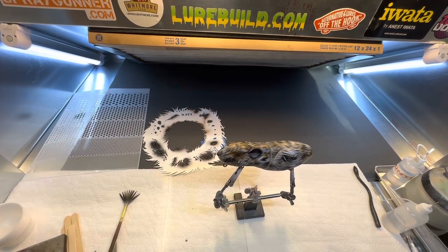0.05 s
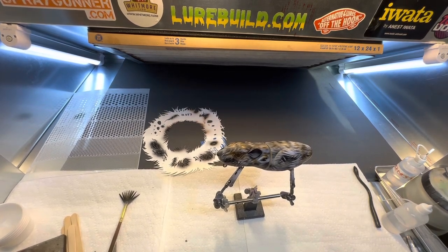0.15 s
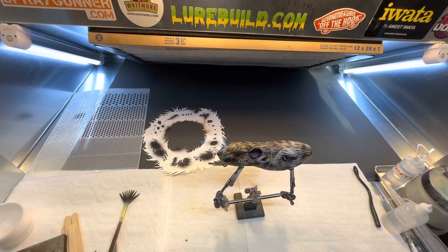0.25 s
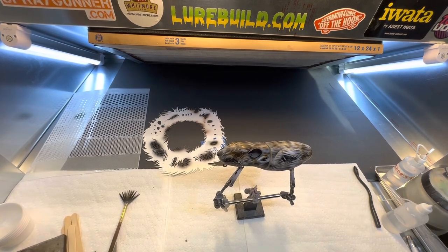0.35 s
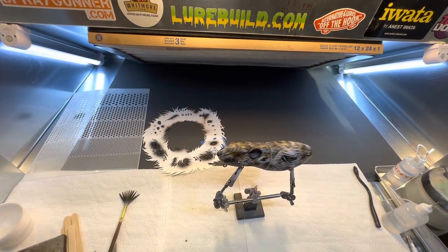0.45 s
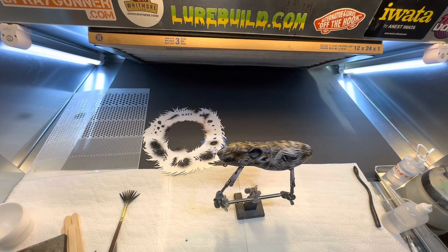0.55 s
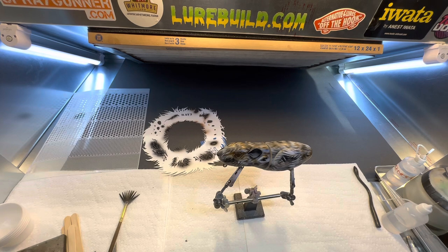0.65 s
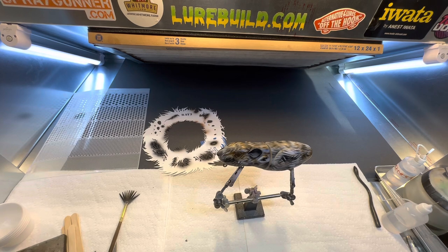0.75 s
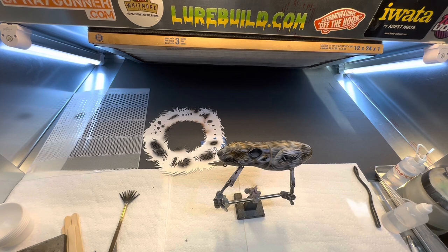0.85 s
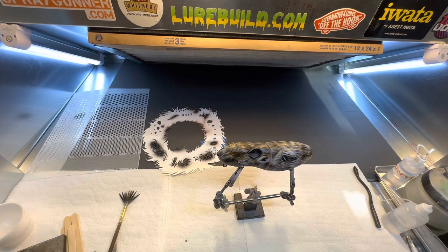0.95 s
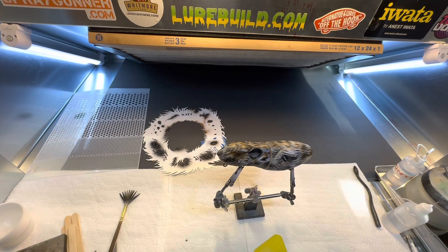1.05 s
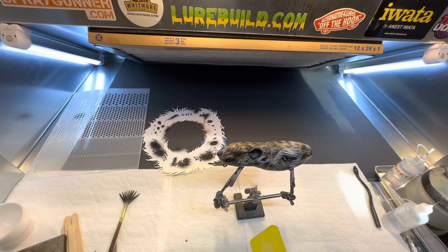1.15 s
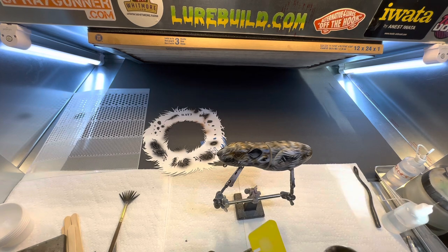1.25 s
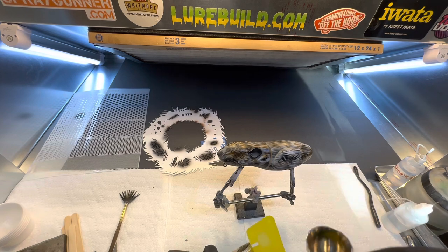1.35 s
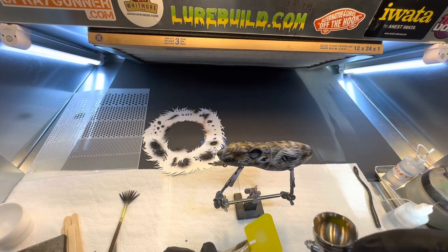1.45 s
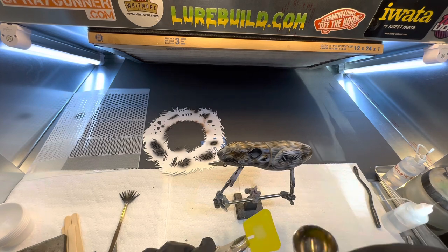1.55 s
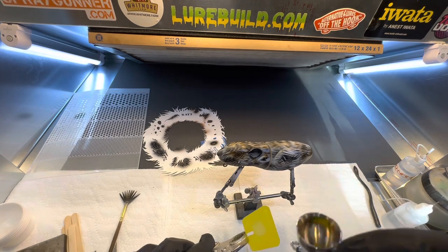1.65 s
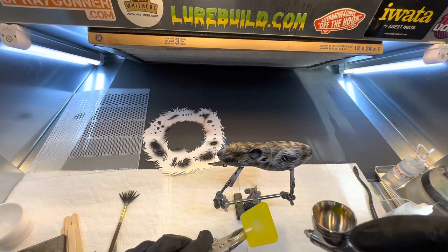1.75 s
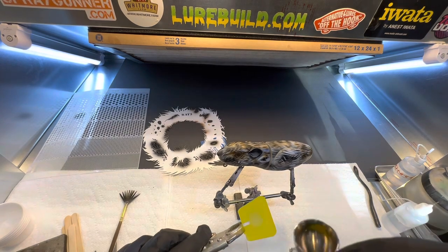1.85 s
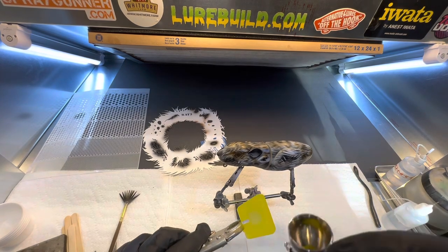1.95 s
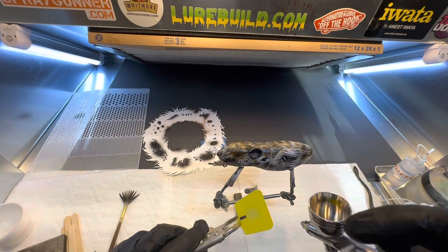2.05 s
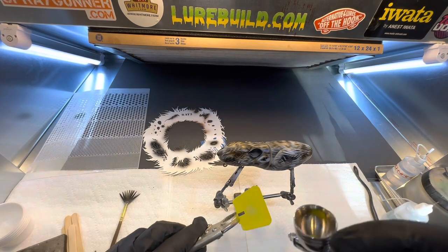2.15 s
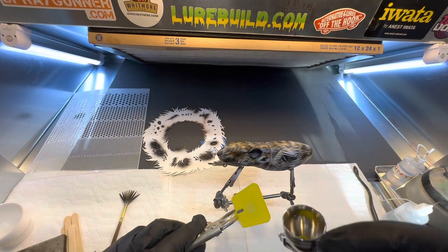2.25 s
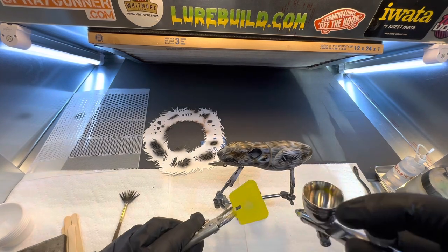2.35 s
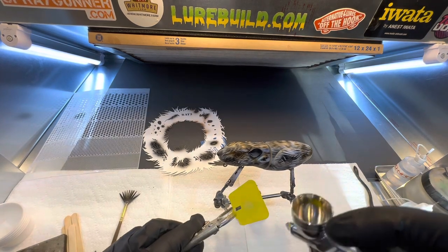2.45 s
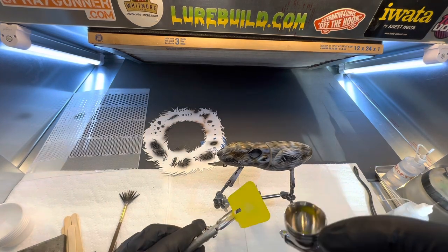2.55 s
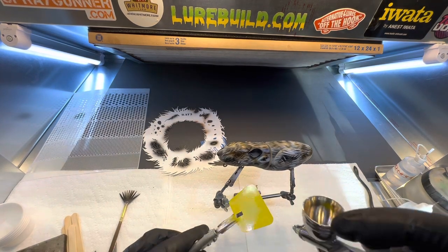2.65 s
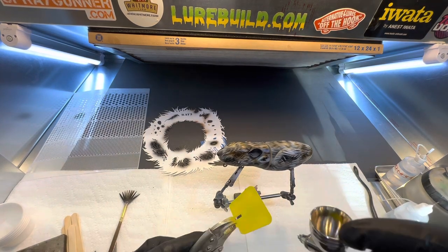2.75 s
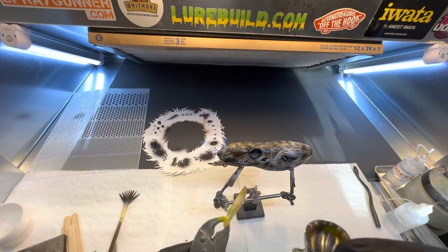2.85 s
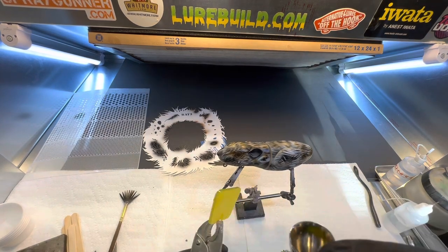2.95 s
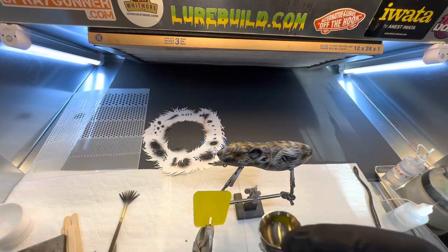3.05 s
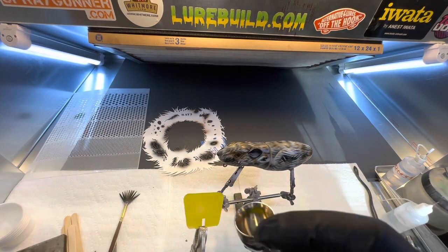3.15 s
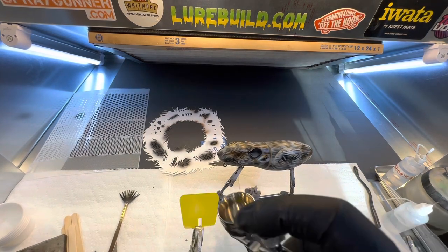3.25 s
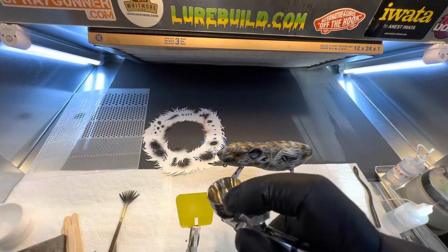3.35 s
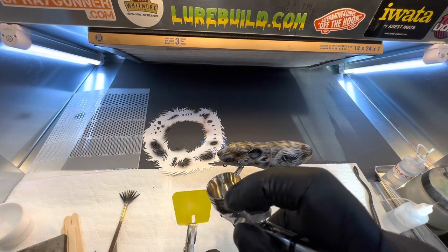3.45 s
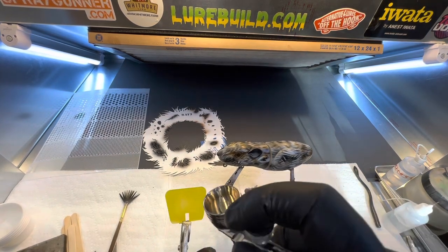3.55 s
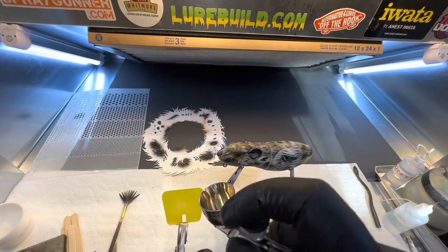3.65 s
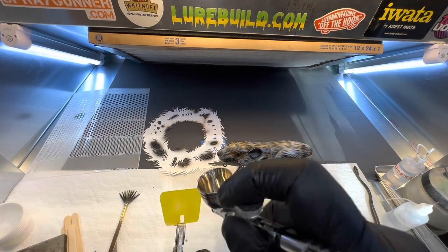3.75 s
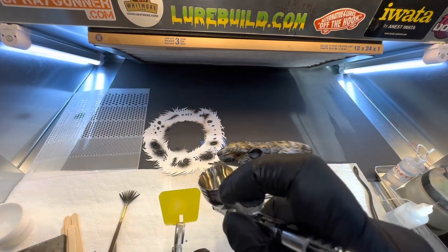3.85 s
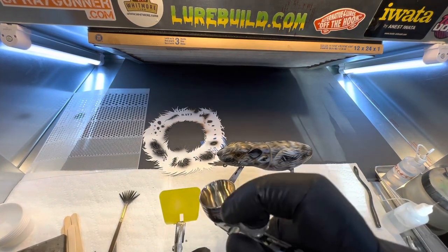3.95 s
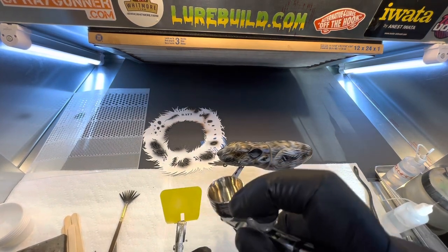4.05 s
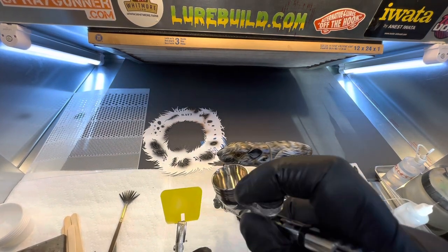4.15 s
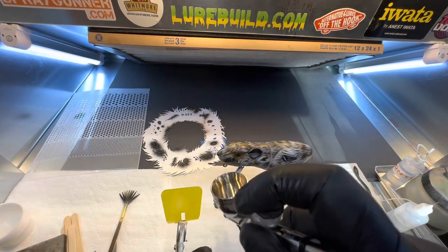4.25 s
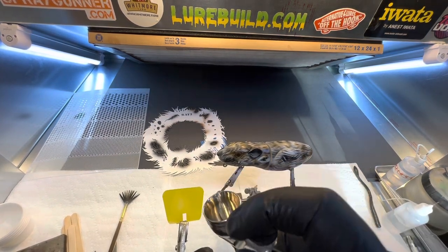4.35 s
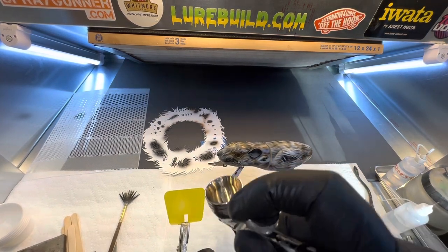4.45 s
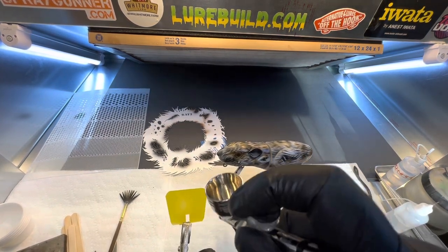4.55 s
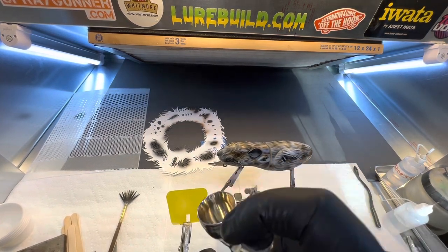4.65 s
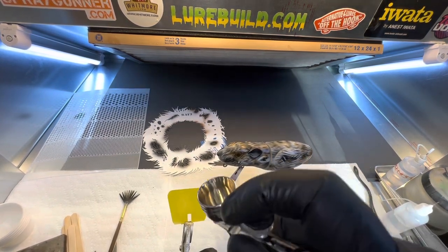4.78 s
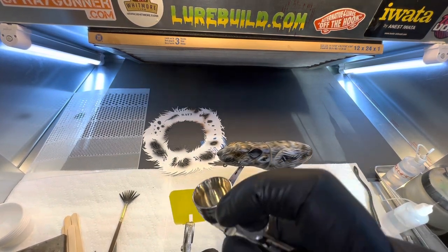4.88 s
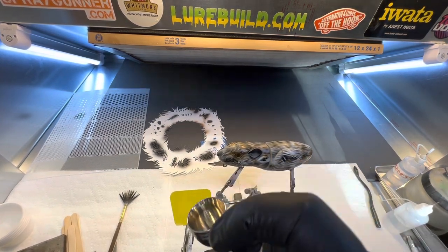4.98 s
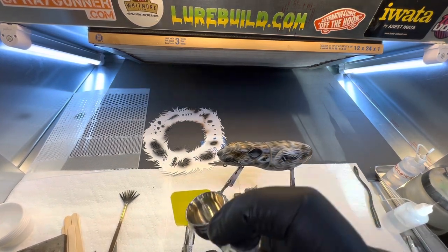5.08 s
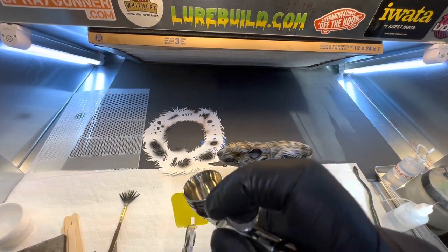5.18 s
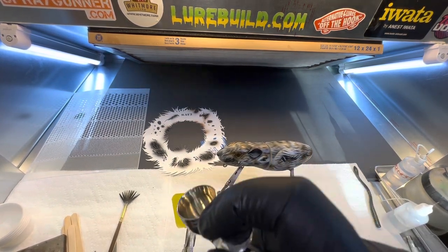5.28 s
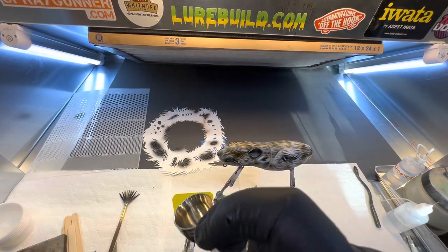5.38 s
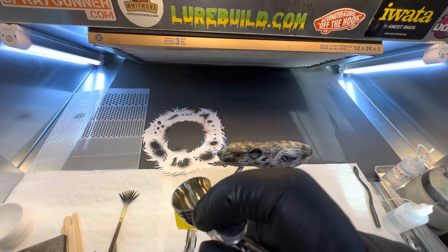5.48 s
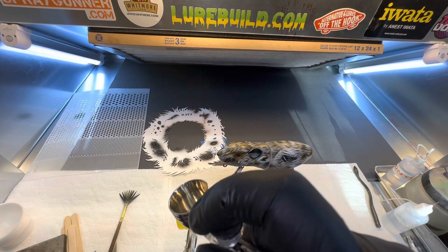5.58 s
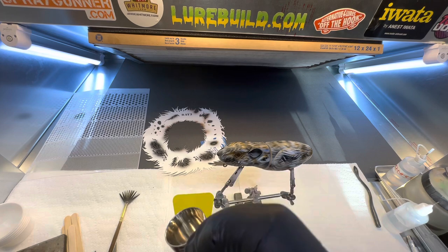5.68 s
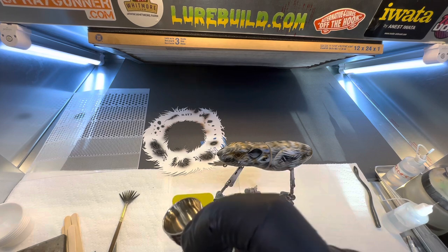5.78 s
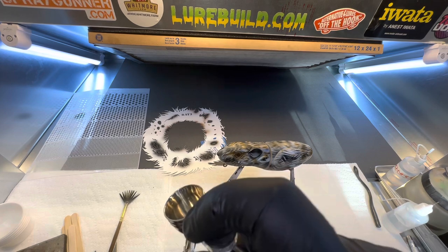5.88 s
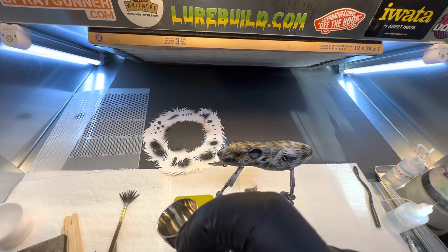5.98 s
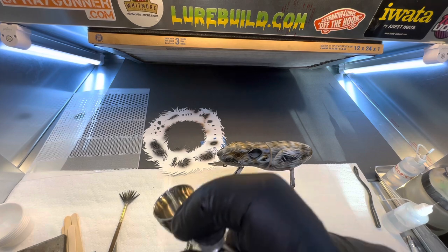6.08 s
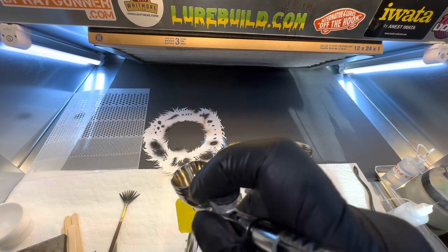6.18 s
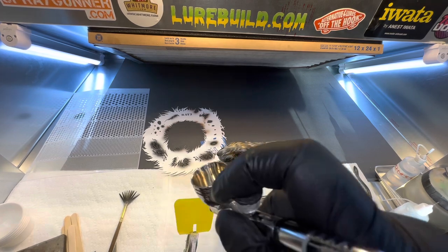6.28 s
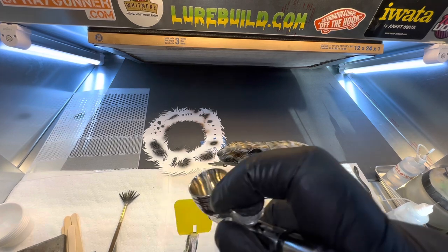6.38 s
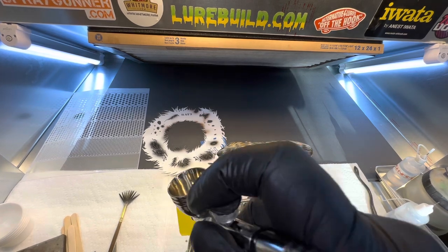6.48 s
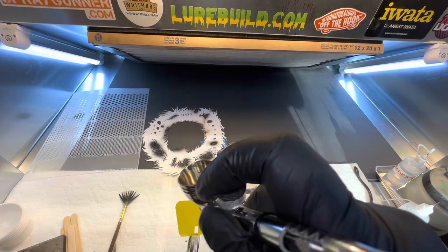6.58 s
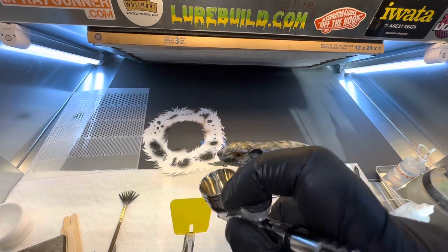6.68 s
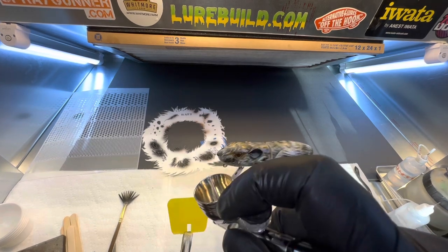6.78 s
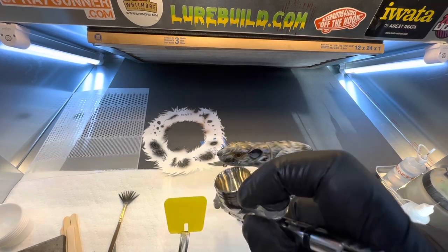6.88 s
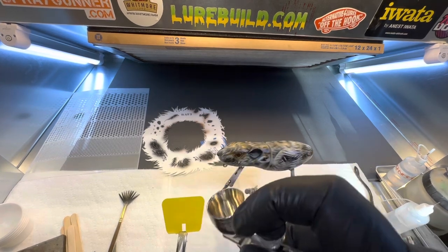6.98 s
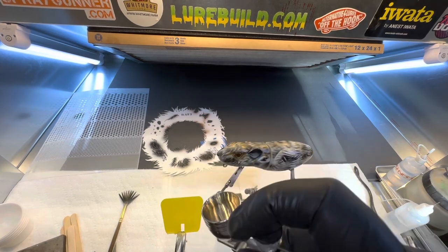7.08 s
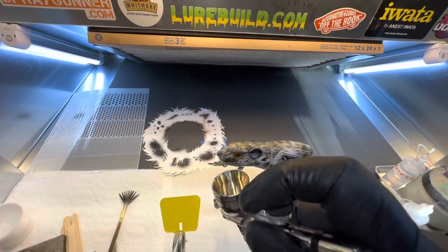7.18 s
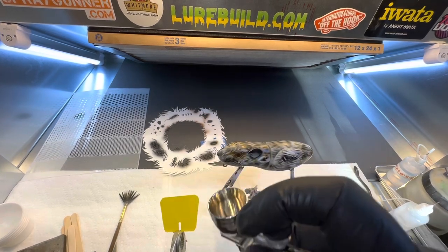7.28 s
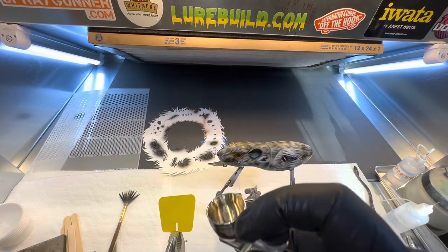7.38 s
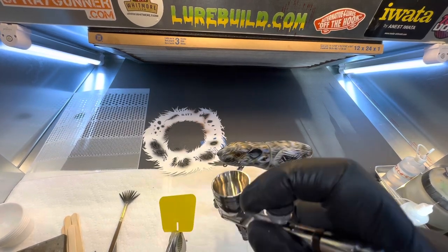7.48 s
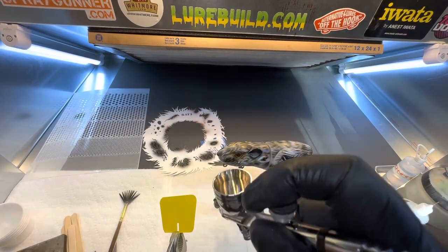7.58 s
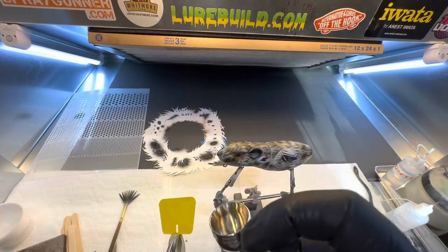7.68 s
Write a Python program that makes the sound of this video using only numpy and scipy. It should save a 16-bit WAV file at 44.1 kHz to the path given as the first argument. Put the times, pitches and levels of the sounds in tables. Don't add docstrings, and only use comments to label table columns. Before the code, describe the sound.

A close stereo microphone in a small spray booth. An exhaust fan rumbles low throughout, with a soft rush of air in the duct. From the start an airbrush hisses thin and very high, with a brief broader draught across the microphone until about 1.3 s. At 1.0 s a tool taps the hollow bench, a short dry knock with a scuff. The hiss weakens, swelling briefly around 1.8 to 2.4 s. At 2.4 s a valve spits air sharply, with a brief falling sigh and fading tail. The compressor buzzes, jerks at 2.55 s, catches at 2.6 s and rocks the bench with a heavy low throb until about 3.2 s. It then hums steadily, knocking and clattering rapidly. From 3.4 s the spray is fuller and splashier, with strokes swelling around 4.4, 4.7, 5.0, 5.4, 5.7 and 6.8 s, continuing to the end at about 7.7 s.

```python
import sys
import numpy as np
from scipy import signal
from scipy.fft import rfft, irfft, next_fast_len
from scipy.io import wavfile
from scipy.ndimage import uniform_filter1d, map_coordinates

SR = 44100
rng = np.random.default_rng(int(sys.argv[2]) if len(sys.argv) > 2 else 0)


def nominal_scale(level):
    x = np.asarray(level, float) / 20
    return 10 ** x


def bounce(signal):
    frames = np.transpose(np.atleast_2d(signal))
    limited = np.clip(frames, -1, 1)
    pcm = np.round(limited * 32767).astype(np.int16)
    wavfile.write(sys.argv[1], SR, pcm)


N = 340452


def unit(x):
    return x / np.sqrt(np.mean(x ** 2) + 1e-20)


def along(points, hz):
    f, *columns = np.transpose(points)
    return [np.interp(np.log(hz + 1), np.log(f + 1), column) for column in columns]


def wobble(rate, size=N):
    knots = rng.standard_normal(int(N * rate / SR) + 4)
    return map_coordinates(knots, [np.arange(size) * (rate * N / SR / size)])


def ramp(start_s, length_s):
    return np.clip((np.arange(N) / SR - start_s) / length_s, 0, 1)


def placed(start_s, x):
    return np.pad(x, ((0, 0), (round(start_s * SR), N)))[:, :N]


def burst(db, rise_s, t60_s):
    t = np.arange(SR) / SR
    return nominal_scale(db - 60 * t / t60_s) * (1 - np.exp(-t / rise_s))


# (frequency [Hz], left minus right [dB], likeness [0-1],
# left leads [rad])
PORTS = [(60, -0.5, .97, 0), (200, 3, 1, 0), (400, 2.5, 0.65, 0), (655, 0.5, 0.06, 2.5),
         (3500, 2, 0.11, 2.5), (5100, 8.5, 0.2, 0), (6400, 10, 0, -0.5), (8100, 7, 0, 1.5),
         (9200, -2, 0.2, 1.5), (9760, 0, 0.5, 1.3),
         (10400, 0, .97, -3.1), (12000, 0, .98, -3.05), (12350, 0, .9, -2.5), (12750, 0, .78, -1.8),
              (13400, 0, .9, -.7), (13850, 0, 1, 0), (15100, 0, 1, 0), (15300, 0, .92, .5),
              (15800, 0, .9, .55)]


def rush(spectrum, patchy_db, size=N, ports=PORTS):
    noise = rng.standard_normal((2, size), dtype=np.float32)
    z = signal.stft(noise, nperseg=512)[2]
    field = uniform_filter1d(rng.standard_normal(z.shape[1:]), size=6, axis=0)
    patches = unit(uniform_filter1d(field, size=12, axis=1))
    pair = signal.istft(z * nominal_scale(patchy_db * patches), nperseg=512)[1][:, :size]

    m = next_fast_len(size + 8192, True)
    hz = np.fft.rfftfreq(m, 1 / SR)
    inside = (hz > spectrum[0][0]) & (hz < spectrum[-1][0])
    a, b = rfft(pair, m) * nominal_scale(along(spectrum, hz)[0]) * inside

    tilt_db, alike, lead = along(ports, hz)
    turn = np.arccos(np.clip(alike, 0, 1)) / 2
    half = nominal_scale(tilt_db / 2) * np.exp(.5j * lead)
    common, apart = np.cos(turn) * a, np.sin(turn) * b
    out = irfft([(common + apart) * half, (common - apart) / half], m)[:, :size]
    return out / np.std(out.mean(axis=0))


# (frequency [Hz], density [dB per Hz])
RUMBLE_SPECTRUM = [(20, -30), (29, -19), (40, -23), (55, -16.5), (76, -11.5), (100, -9.5), (130, -4.5),
                   (153, 0.5), (200, -13), (225, -13.5), (240, -11.5), (268, -12.5), (300, -10), (335, -9),
                   (400, -23.5)]
# (frequency [Hz], density [dB per Hz])
DUCT_SPECTRUM = [(250, -40), (400, -3.5), (455, 2), (520, -1.5), (750, 0), (1000, -4.5), (1300, -7),
                 (1600, -11.5), (1950, -6.5), (2300, -11.5), (2800, -13.5), (3600, -20.5), (5000, -37),
                 (9000, -34)]
# (time [s], level [dB])
DRAW = [(0, -0.5), (1.2, .5), (1.9, -2), (2.02, 2), (2.5, 0.8), (3.2, -2), (4.2, -0.5), (7.72, 0.4)]


def fan():
    draw_db = np.interp(np.arange(N) / SR, *np.transpose(DRAW))
    rumble_db = -36 + draw_db + 0.68 * wobble(6)
    duct_db = -45 + 0.27 * draw_db + .4 * wobble(5)
    rumble = nominal_scale(rumble_db) * rush(RUMBLE_SPECTRUM, patchy_db=1.36)
    return rumble + nominal_scale(duct_db) * rush(DUCT_SPECTRUM, patchy_db=1.56)


# (frequency [Hz], level [dB], t60 [s])
BENCH_MODES = [(410, -4, 0.14), (786, -10, 0.11), (1043, -0.5, 0.087), (1110, -3, .04), (1154, -3, 0.075),
               (1300, -9, .1), (1980, -19, .04)]
# (frequency [Hz], density [dB per Hz])
SCUFF_SPECTRUM = [(300, -5), (700, 0.5), (1150, -1), (2000, -10.5), (3500, -15), (5500, -18), (8000, -40)]
# (peak [dB], rise [s], t60 [s])
TAP_BURST = (-27.5, .0008, .13)


def tap():
    db, rise_s, t60_s = TAP_BURST
    t = np.arange(SR) / SR
    ring = 0
    for hz, level_db, decay_s in BENCH_MODES:
        ring = ring + burst(db + level_db, rise_s, decay_s) * np.sin(2 * np.pi * hz * t)
    ring = ring * nominal_scale([[1.5], [-1.5]])
    scuff = burst(db - 5, 0.0074, 2.6 * t60_s) * rush(SCUFF_SPECTRUM, patchy_db=2.5, size=SR)
    return placed(1.0328, ring + scuff)


# (start time [s], whistle level [dB], whistle drift [dB per s], jet edge level [dB],
# splash level [dB])
HOLDS = [(0, -40, -3, -53.5, -53.5), (1.05, -43, -2, -53.5, -50), (1.3, -47.5, 5.5, -55.5, -50),
         (1.85, -44.5, 1, -60, -50), (2.64, -59, 5, -61, -51.5), (3.4, -43, 0.16, -51, -43.5),
         (6.15, -43.5, .1, -52.5, -44)]
# (time [s], swell [dB], half length [s])
STROKES = [(.6, 3, .13), (1.84, 2, 0.13), (2.14, 3.5, 0.15), (2.434, 5.5, 0.12), (3.62, 1, .1),
           (4.39, 2.5, .12), (4.71, 6, 0.18), (5.038, 5.5, .15), (5.37, 4.5, .11), (5.72, 4.5, 0.11),
           (6.77, 3, .08)]


def hand():
    trigger_s, aim_s = .035, 0.21
    t = np.arange(N) / SR
    holds = np.transpose(HOLDS)
    now = np.searchsorted(holds[0], t, "right").clip(1) - 1
    start, whistle_db, drift, edge_db, splash_db = holds[:, now]
    swell_db = sum(db * np.exp(-((t - s) / half) ** 2) for s, db, half in STROKES)

    def smooth(x, length_s):
        return uniform_filter1d(x, size=int(length_s * SR) + 1, mode="nearest")

    def late(x):
        return smooth(np.pad(x, (int(aim_s * SR / 2), 0), "edge")[:N], aim_s)

    whistle_db = smooth(whistle_db + drift * (t - start), trigger_s) + swell_db
    return whistle_db, late(edge_db) + .4 * swell_db, late(splash_db) + .1 * swell_db


# (frequency [Hz], density [dB per Hz])
WHISTLE_SPECTRUM = [(9600, -38), (10600, -7.5), (11300, -4), (12000, -4), (12700, -0.5), (14000, -2.5),
                    (15500, -1), (15800, -11), (15950, -60)]
# (frequency [Hz], density [dB per Hz])
EDGE_SPECTRUM = [(8000, -36), (8800, -10), (9400, 4), (10200, 0.5), (10800, -2)]
# (frequency [Hz], density [dB per Hz])
SPLASH_SPECTRUM = [(1800, -15), (2600, -3.5), (3500, -2), (4100, -5.5), (5000, -1.5), (5600, -1.5),
                   (6500, -3.5), (7500, -3), (8200, -1.5), (8700, -2.5), (9400, -5)]
# (frequency [Hz], density [dB per Hz])
DRAUGHT_SPECTRUM = [(900, -12), (1250, 4.5), (1500, -0.5), (2000, -20), (2750, -3), (3400, -9),
                    (4400, -7.5), (5200, -7), (6000, -5.5), (7500, -5), (8600, -7), (9300, -0.5),
                    (10300, -1)]
# (frequency [Hz], left minus right [dB], likeness [0-1], left leads [rad])
PORTS_FRONT = [(900, 8, 1, 0), (2750, 1, .95, 0), (4400, -1, 1, 1), (5360, 4, .4, 2.5), (6800, 13, .3, 3.3),
               (8300, 1, 0.67, 4.5), (8500, .1, .97, 3.2), (8800, -.1, 0.97, 4), (9200, -9, 0.93, 4),
               (10000, 0, .7, -0.5)]


def airbrush():
    whistle_db, edge_db, splash_db = hand()
    flutter_db = .5 * wobble(12) + 0.52 * wobble(60)
    jet = nominal_scale(whistle_db + 2.5 + flutter_db) * rush(WHISTLE_SPECTRUM, patchy_db=2.0)
    edge = nominal_scale(edge_db - 0.3 + .6 * flutter_db) * rush(EDGE_SPECTRUM, patchy_db=1.5)
    splash = nominal_scale(splash_db + 0.4 + 0.33 * flutter_db) * rush(SPLASH_SPECTRUM, patchy_db=1.3)
    draught = rush(DRAUGHT_SPECTRUM, patchy_db=2.5, size=2 * SR, ports=PORTS_FRONT)
    across = nominal_scale(-47.5) * ramp(1.34, -.3) * placed(0, draught)
    return jet + edge + splash + across


# (peak [dB], rise [s], t60 [s])
VALVE_BURST = (-25.5, .001, .26)
# (frequency [Hz], density [dB per Hz])
BLAST_SPECTRUM = [(600, -19), (880, 4), (1200, -5), (1900, -4), (2400, -15), (2900, -7.5), (3600, -6.5),
                  (4300, -3), (5000, -14), (5800, -3), (6800, -14), (8500, -6), (11000, -10), (15800, -14)]
# (frequency [Hz], sag [Hz per s], level [dB], t60 [s])
SIGHS = [(992, 380, -38, 0.52), (883, 20, -33, .22), (1045, 20, -35, .2), (1120, 20, -38, .18)]


def valve():
    db, rise_s, t60_s = VALVE_BURST
    t = np.arange(SR) / SR
    spit = burst(db, rise_s, t60_s) * rush(BLAST_SPECTRUM, patchy_db=1.5, size=SR)
    sigh = 0
    for hz, sag, level_db, decay_s in SIGHS:
        sigh = sigh + burst(level_db, .003, decay_s) * np.sin(2 * np.pi * (hz - sag * t / 2) * t)
    tail = burst(db - 11, .03, 0.71) * rush(BLAST_SPECTRUM, patchy_db=3.0, size=SR)
    return placed(2.4345, spit + sigh + tail)


def orders(table, angle, start, spread, unsteady_db):
    step = 8
    angle = angle[::step]
    out = np.zeros((2, len(angle)))
    paths = rng.normal(0, spread, len(table))
    for (k, mid_db, side_db), phase, path in zip(table, start, paths):
        swell = np.sqrt(2) * nominal_scale(unsteady_db * wobble(2.99, size=len(angle)))
        mid = nominal_scale(mid_db) * swell * np.cos(k * angle + phase)
        side = nominal_scale(side_db) * swell * np.cos(k * angle + phase + path)
        out += [mid + side, mid - side]
    return signal.resample_poly(out, step, 1, axis=1)[:, :N]


# (multiple of shaft speed, level common to both ports [dB], level of their difference [dB])
HUM = [(1, -54, -71), (2, -40, -42), (3, -42, -56), (4, -33, -52), (5, -53, -70), (6, -43, -61),
       (7, -49, -49), (8, -44, -49), (9, -58, -58), (10, -55, -56), (11, -57, -61), (12, -43, -62),
       (13, -57, -66), (14, -55, -62), (15, -63, -63), (16, -56, -54)]
# (multiple of shaft speed, common level [dB], difference level [dB])
KNOCK = [(18, -64, -62), (19, -61, -60), (20, -54, -59), (21, -63, -62), (22, -64, -61), (23, -63, -65),
         (24, -62, -55), (25, -65, -65), (26, -53, -45), (27, -64, -51), (28, -50, -47), (29, -60, -57),
         (30, -49, -56), (31, -59, -56), (32, -54, -48), (33, -61, -59), (34, -57, -52), (35, -49, -51),
         (36, -56, -49), (37, -53, -52), (38, -61, -51), (39, -63, -55), (40, -55, -60), (41, -67, -63),
         (42, -55, -65), (43, -65, -59), (44, -66, -60), (45, -65, -67), (46, -57, -62)]
# (multiple of shaft speed, common level [dB],
# difference level [dB])
KNOCK_MORE = [(38.45, -57, -58), (47, -61, -59), (50, -57, -60), (51, -60, -61), (53, -62, -61), (54, -61, -60),
              (56, -62, -63), (58, -62, -62), (63, -63, -62), (64, -63, -61), (66, -60, -60), (69, -64, -64),
              (71, -64, -64)]
# (frequency [Hz], density [dB per Hz])
CLATTER_SPECTRUM = [(300, -25), (560, -5.5), (680, -19), (800, -1.5), (1050, -1), (1250, -7.5),
                    (1550, -6.5), (2000, -12), (2500, -12), (4000, -14.5), (5200, -12.5), (6500, -35),
                    (9000, -34), (15800, -32)]


def compressor():
    start_s, lurch_s, catch_s, load_s = 2.44, 2.55, 2.62, 2.83
    t = np.arange(N) / SR
    run = np.maximum(t - start_s, 0)
    speed_hz = 28.444 + .0105 * run - 4.5 * np.exp(-run / .17)
    angle = 2 * np.pi * np.cumsum(speed_hz + .012 * wobble(8)) / SR

    lurch = nominal_scale(3) * np.exp(-((t - lurch_s) / .03) ** 2)
    phases = rng.uniform(0, 2 * np.pi, len(HUM))
    hum = orders(HUM[:1] + HUM[2:], angle, phases, spread=0.99, unsteady_db=0.67)
    hum = (ramp(catch_s, 0.24) + .07 * lurch) * hum

    phases = rng.uniform(0, 2 * np.pi, len(HUM))
    rock = orders(HUM[1:2], angle, phases, spread=.5, unsteady_db=1.0)
    felt = rock.mean(axis=0)
    shake = lurch + ramp(catch_s, 0.045) * nominal_scale(9 * ramp(3.18, -.22))
    rock = shake * felt + np.minimum(shake, 1.25) * (rock - felt)

    k = np.transpose(KNOCK + KNOCK_MORE)[0]
    aligned = np.angle(1 + .8 * np.exp(2j * np.pi * .48 * k)) + rng.normal(0, .7, len(k))
    unloaded = 0.38
    load = unloaded * ramp(start_s, load_s - start_s) + (1 - unloaded) * ramp(load_s, 0.054)
    knock = orders(KNOCK + KNOCK_MORE, angle, aligned, spread=1.35, unsteady_db=.8)
    knock = nominal_scale(.6) * load * knock

    gate = unit(nominal_scale(0.84 * np.cos(2 * angle)))
    clatter = gate * nominal_scale(-43.5) * ramp(start_s, 0.42) * rush(CLATTER_SPECTRUM, patchy_db=0.7)

    buzz_db = -35 - 160 * np.maximum(t - catch_s, 0)
    buzz = ramp(start_s, catch_s - start_s) * nominal_scale(buzz_db) * np.sin(2 * np.pi * 119 * t)
    return hum + rock + knock + clatter + buzz


def scene():
    return fan() + airbrush() + tap() + valve() + compressor()


def band_limit(x):
    return signal.sosfilt(signal.butter(12, 16000, fs=SR, output="sos"), x)


def record(dry):
    return band_limit(dry)


dry = scene()
out = record(dry)
bounce(out)
```